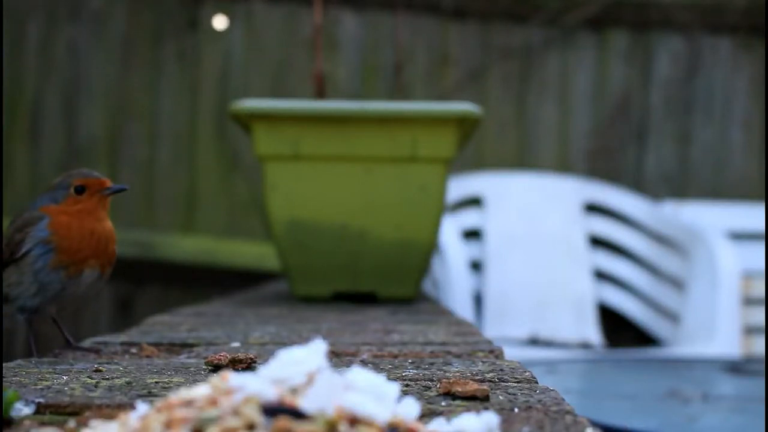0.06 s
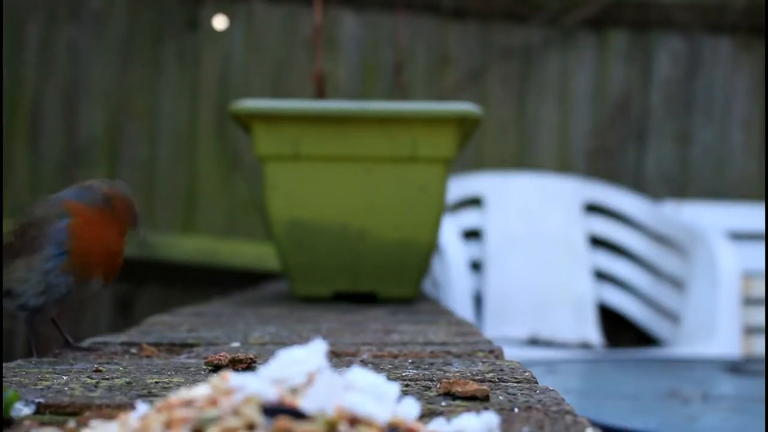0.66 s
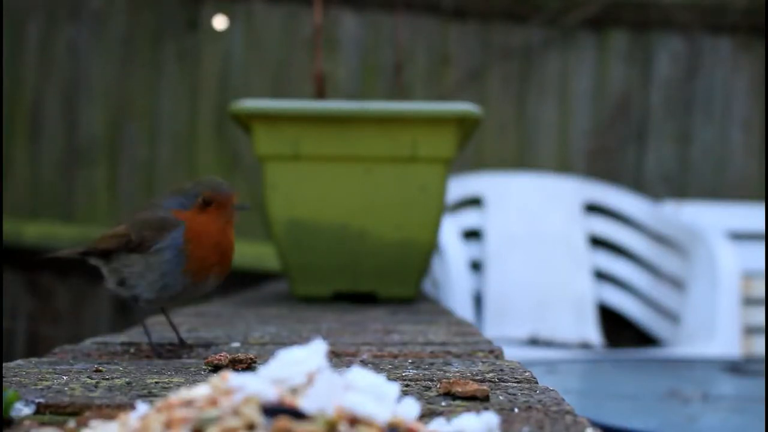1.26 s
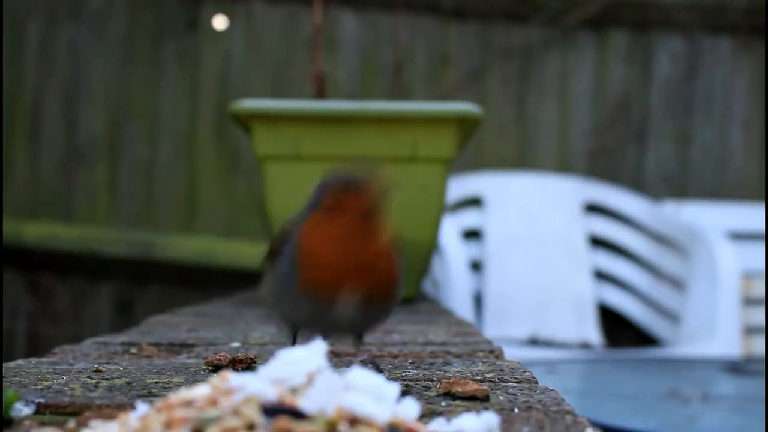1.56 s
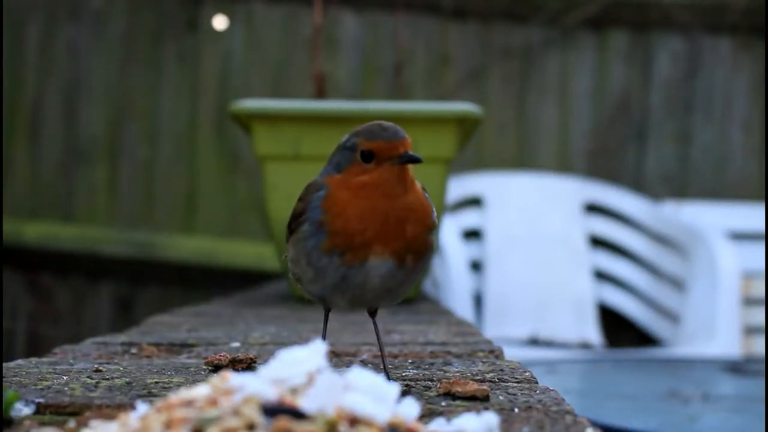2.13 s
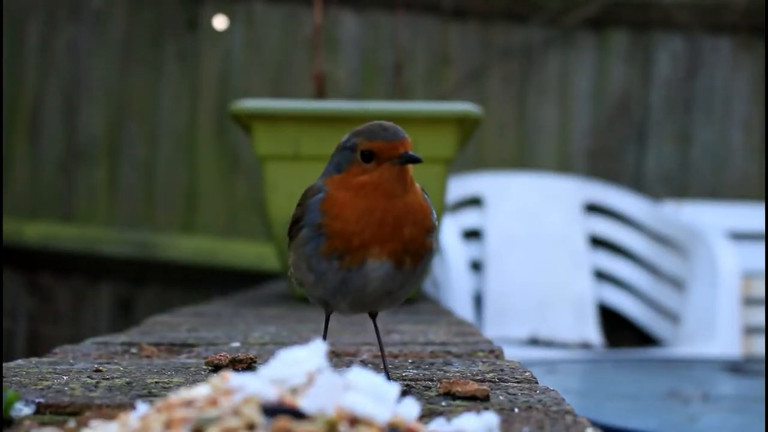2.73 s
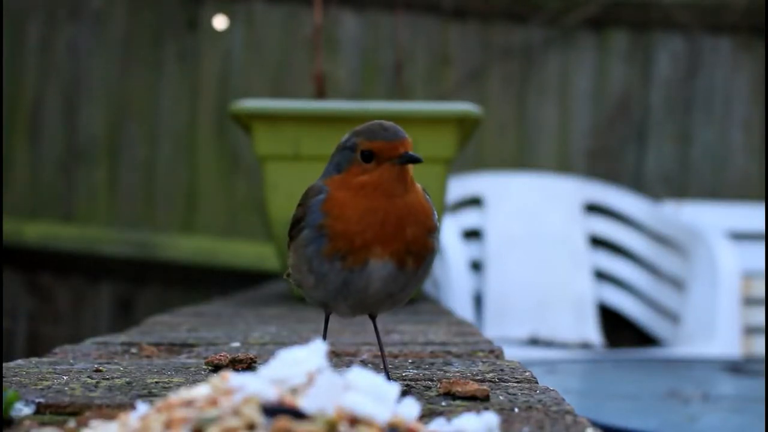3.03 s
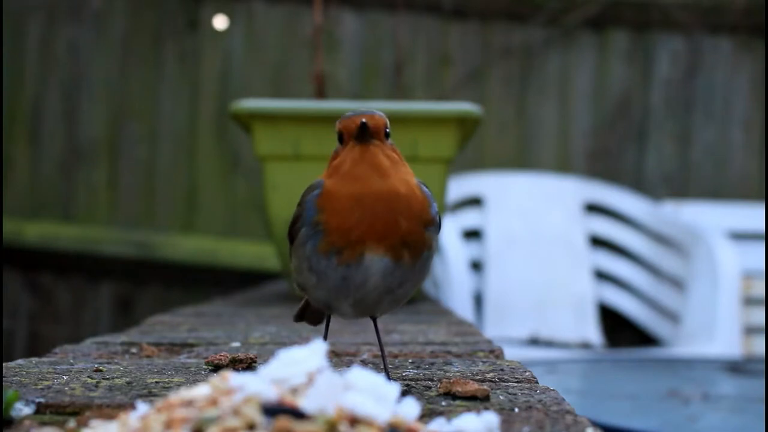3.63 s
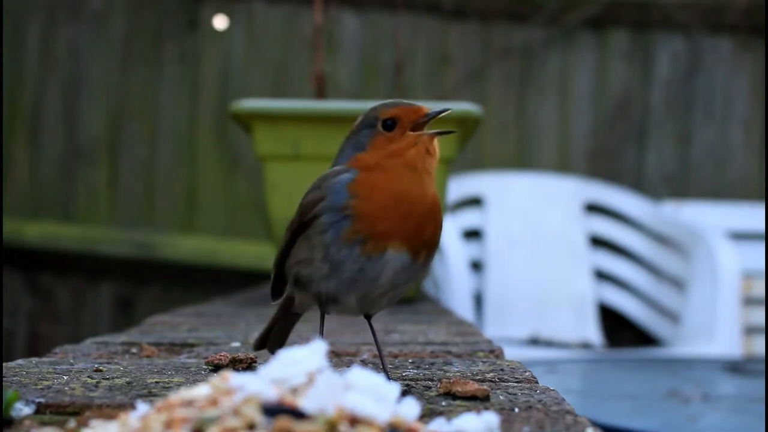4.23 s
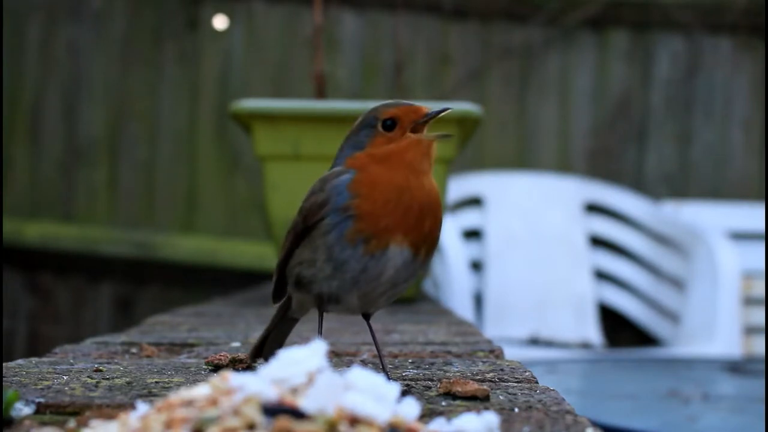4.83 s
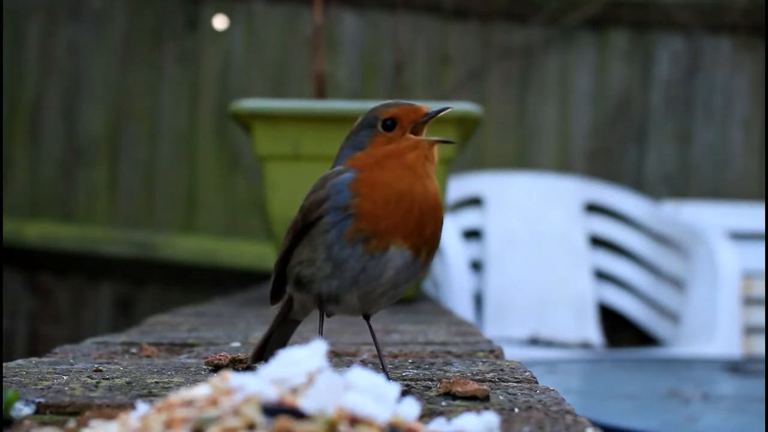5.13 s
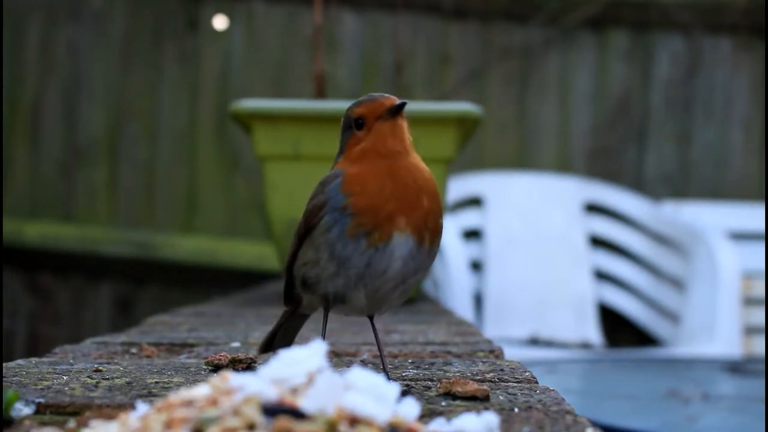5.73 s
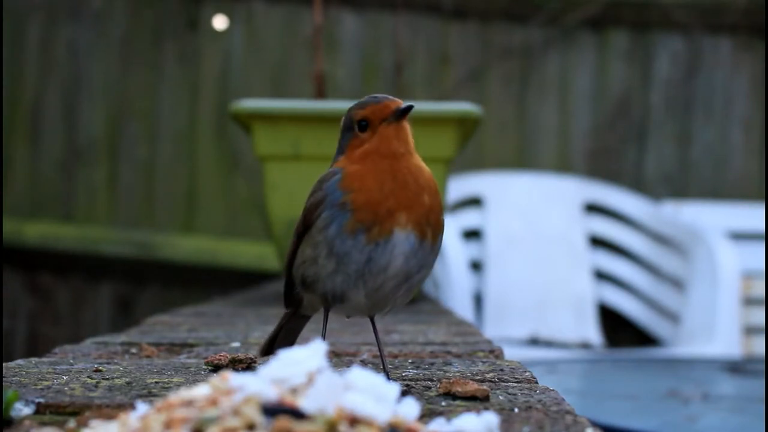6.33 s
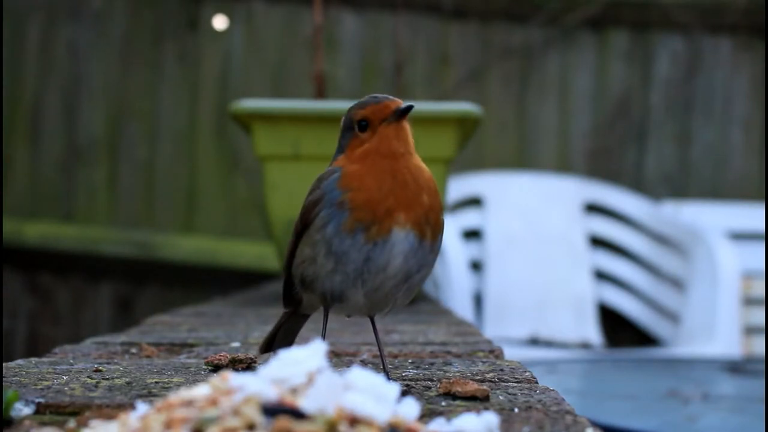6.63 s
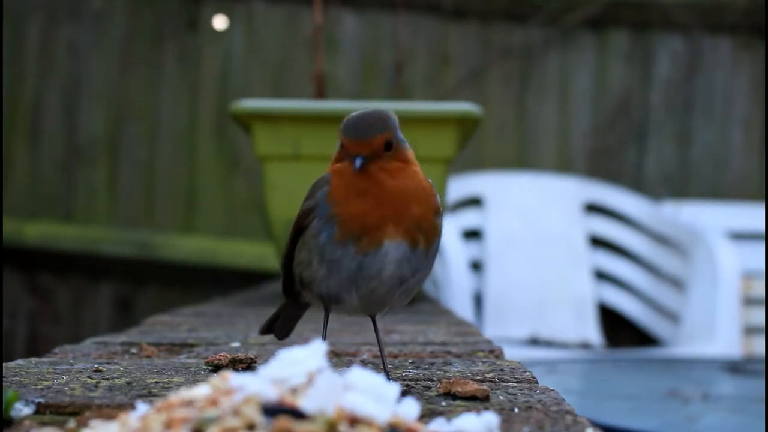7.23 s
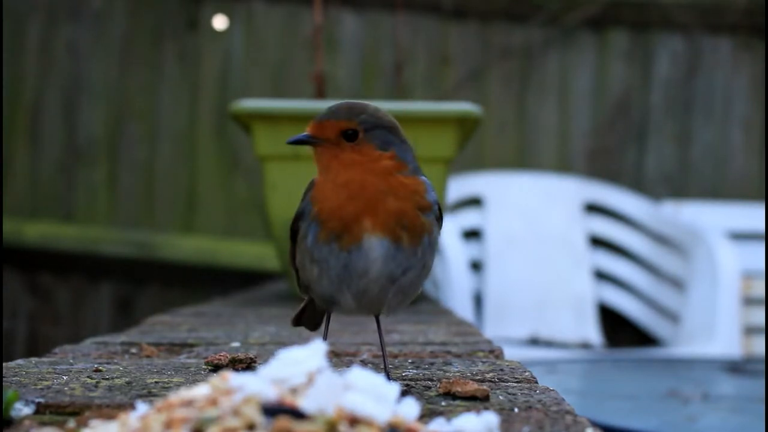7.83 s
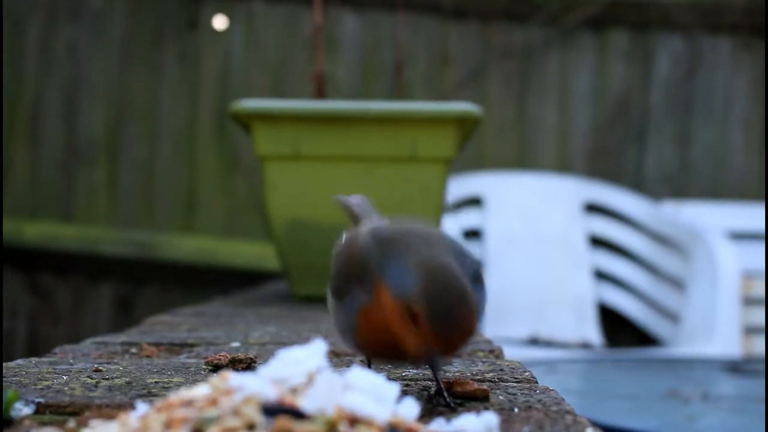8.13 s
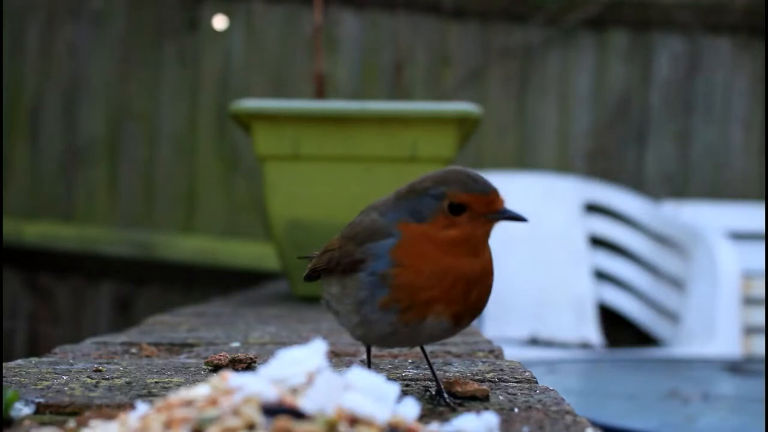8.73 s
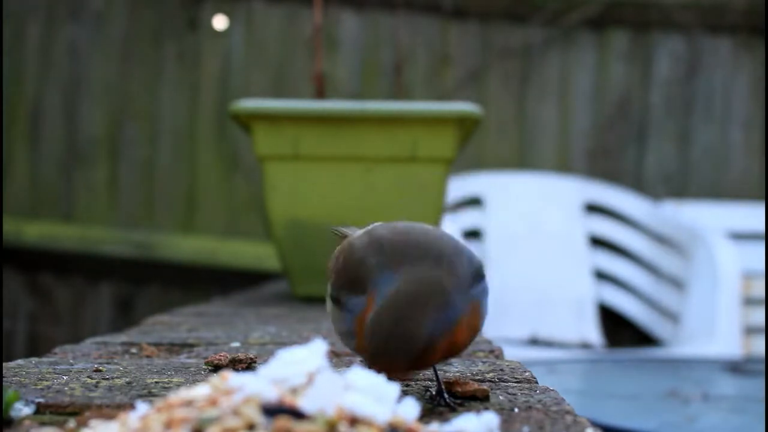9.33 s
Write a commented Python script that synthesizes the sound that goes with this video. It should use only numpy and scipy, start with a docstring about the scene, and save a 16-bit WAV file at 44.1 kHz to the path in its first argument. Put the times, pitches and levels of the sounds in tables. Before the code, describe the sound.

A robin sings a single loud burst right by the microphone, about two seconds of quick, high whistles, chips and buzzy warbles, after a quiet opening of far chirps and town hum. Partway through the phrase, a more distant pigeon begins low, hollow cooing. Once the robin stops, the coos continue in the garden with thin calls from small birds and a soft wash of faraway traffic.

```python
"""Fenced garden. A robin sings one loud phrase close to a camera on a table: two whistling
voices from the two sides of the syrinx, echoed by nearby surfaces. Farther off, a pigeon coos
in hoarse, hollow arches and small birds chirp, over the steady hum of a town.
The camera's gain control ducks the background under the loudest notes."""
import sys
import numpy as np
from scipy import signal
from scipy.fft import rfft, irfft
from scipy.io import wavfile
from scipy.ndimage import uniform_filter1d, minimum_filter1d

SR = 44100
rng = np.random.default_rng(int(sys.argv[2]) if len(sys.argv) > 2 else 0)


def store_pcm(level_fs):
    """Save levels as 16-bit WAV."""
    pcm = np.round(np.clip(level_fs, -1, 1) * 32767).astype(np.int16)
    wavfile.write(sys.argv[1], SR, np.atleast_2d(pcm).T)


N = 413216
TIME = np.arange(N) / SR

# robin, one table per side of the syrinx:
# (time [s], length [s], start [Hz], middle [Hz], end [Hz], level [dB], swell [dB])
UPPER_NOTES = [ (3.306, .045, 7580, 7620, 8490, -39.5, 6), (3.357, .022, 8630, 8600, 7000, -42, 23.5),
               (3.424, .1, 8560, 8250, 8056, -41.5, 10), (3.52, .03, 7704, 7450, 7550, -28.5, 4),
               (3.546, .024, 7620, 7950, 6110, -26, 5.5), (3.624, .012, 6260, 7200, 7940, -14.5, -5),
               (3.636, .013, 6250, 5300, 5540, -13.5, 6), (3.648, .012, 6356, 6280, 6594, -7, 0.5),
               (3.663, .019, 6682, 6030, 6776, -5.5, -1.5), (3.679, .01, 5910, 5180, 5390, -1.5, 1),
               (3.689, .01, 5460, 5100, 5870, -9, 4.5), (3.7, .009, 5810, 5130, 5940, -5, -1.5),
               (3.709, .008, 6664, 6100, 5410, -12, -2), (3.719, .014, 5186, 4400, 4664, -2, -15.5),
               (4.112, .023, 4020, 5100, 4550, -0.5, -3.5), (4.131, 0.058, 4470, 4170, 4324, 1.5, 3),
               (4.215, .028, 4690, 4430, 4265, -10, 3.5), (4.62, .027, 7260, 7290, 6600, -4, -3.5),
               (4.647, .011, 6480, 5900, 5630, -9, -5), (4.6985, .016, 5600, 5450, 5820, 5, -1),
               (4.74, .013, 6275, 6065, 6060, -7.5, -0.5), (4.754, .031, 5920, 4700, 4594, -0.5, -8),
               (4.8308, .023, 6170, 6250, 6096, 1, -4.5), (4.922, .014, 4180, 4300, 5900, -17.5, 7.5),
               (4.937, .009, 5580, 5600, 6010, -4.5, -2), (4.994, .042, 6830, 7290, 6980, -2, -2),
               (5.037, .067, 6840, 7240, 5650, -5, 2.5), (5.146, .042, 5560, 5040, 4870, 4.5, -6),
               (5.182, 0.029, 4880, 5425, 6350, 1.5, -6.5), (5.2632, .062, 4640, 4730, 4890, 1, -6), ]
LOWER_NOTES = [ (3.33, 0.049, 5730, 6800, 7300, -54.5, 24), (3.393, 0.13, 7300, 7360, 7020, -52, 18),
               (3.52, .048, 6620, 6440, 6800, -34, 2), (4.213, 0.023, 4274, 4050, 3966, 1, -5), ]
# robin's dry chips: (time [s], length [s], start [Hz], middle [Hz], end [Hz], peak [dB])
CHIPS = [ (3.766, .014, 3916, 5550, 4600, -3.5), (3.784, 0.015, 4880, 3476, 3455, -5),
         (3.8243, 0.01, 2994, 5010, 4400, -3), (3.845, .011, 4690, 3300, 4090, -7),
         (3.8856, 0.007, 4240, 5550, 4500, 2), (3.905, .009, 4774, 3650, 4400, -15),
         (3.942, .012, 4340, 6300, 5600, -6.5), (3.9658, 0.0076, 4960, 5600, 5000, -3.5),
         (4.023, .016, 5245, 7150, 5700, 1.5), (4.044, 0.012, 6783, 6750, 6150, -4.5), ]
# two-voice buzz: (time [s], upper pitch [Hz], lower pitch [Hz])
BUZZ = [(4.236, 4306, 3834), (4.27, 4240, 3820), (4.346, 4310, 3870), (4.446, 4320, 3710),
        (4.484, 4280, 3620), (4.524, 4338, 3665)]
# soft closing whistle: (time [s], pitch [Hz])
CLOSING_WHISTLE = [(5.334, 5550), (5.386, 5380), (5.41, 5170), (5.448, 4987), (5.535, 4965)]
# hoarse stretches of the song: (time [s], length [s], level [dB])
HOARSE_SPANS = [(3.623, 0.0956, -41), (4.154, 0.032, -50), (4.256, 0.28, -49.5), (4.931, 0.041, -40),
                (5.307, 0.1, -39.5)]
# beak and claw ticks: (time [s], level [dB])
TICKS = [(1.545, -58), (3.317, -48), (4.012, -33)]
# rasp and tick noise: (frequency [Hz], relative density [dB])
RASP_SPECTRUM = [(500, -32), (1300, -15), (2600, -3), (3800, 0), (5800, -3), (8000, -14), (11000, -23),
                 (16000, -36)]
# reflections off nearby surfaces: (delay [s], gain [dB])
ECHOES = [(.0021, -21.5), (.0058, -18.5), (0.012, -27.5), (0.017, -19.5), (.031, -27.5), (.052, -36.5)]
# pigeon: (time [s], length [s], start [Hz], top [Hz], end [Hz], top position [0-1],
# level [dB], swell [dB], roughness [0-1])
COOS = [ (4.02, 0.27, 401, 462, 457, 0.52, -43, 6, 0.4),
        (4.261, 0.18, 482.4, 615, 549, .68, -26.5, -10, 0.67),
        (4.579, 0.34, 476, 575, 336, 0.33, -25.5, -15.5, 0.38),
        (5.184, 0.29, 531, 545, 385, 0.3, -29.5, -6.5, 0.4),
        (5.569, 0.24, 437.5, 428, 353, 0, -37.5, -0.5, .1),
        (6.239, 0.23, 381.7, 548, 529.4, 0.55, -34.5, 6.5, 0.29),
        (6.714, 0.16, 388.3, 512, 490, 0.48, -31, 2.5, 0.54),
        (6.869, 0.14, 508.6, 511.7, 519.7, 0.56, -26, 1, .12),
        (7, .18, 519.7, 592, 541.6, 0.69, -29, -5, 0.46),
        (7.324, .32, 472, 590, 369, 0.33, -31.5, -3.5, 0.69),
        (7.936, 0.26, 471.4, 562, 480.6, 0.32, -32.5, 1.5, .55),
        (8.36, 0.32, 455, 462, 351, 0.14, -28.5, -17, 0.1),
        (9.03, 0.29, 383.6, 580, 545, 0.67, -32, -4.5, 0.57), ]
# far falling chirps: (time [s], middle pitch [Hz], relative level [dB])
FAR_FALLS = [ (1.45, 3540, -55), (1.781, 4090, -54), (2.07, 4030, -53), (2.31, 4170, -54),
             (2.551, 3980, -49), (2.65, 4980, -59), (5.62, 3940, -51), (5.905, 3950, -47),
             (6.16, 3950, -50.5), (6.42, 3854, -49), (6.49, 3970, -47.5), (6.741, 4050, -43),
             (6.97, 3900, -42.5), (7.05, 3700, -47), (7.212, 3910, -42), (7.441, 4030, -45.5),
             (7.709, 3880, -48), (8.205, 3800, -53), (8.21, 4900, -55), (8.534, 3934, -47.5),
             (8.755, 4850, -52), (8.84, 3990, -50), ]
# far upward flicks: (time [s], top pitch [Hz], relative level [dB])
FAR_FLICKS = [(0.189, 4500, -52), (.79, 4480, -52), (2.33, 7900, -55), (7.816, 8010, -52),
              (8.403, 8100, -55)]
# far whistles: (time [s], length [s], start [Hz], end [Hz], relative level [dB])
FAR_WHISTLES = [ (2.691, .031, 4570, 4420, -43.5), (3.315, 0.11, 3110, 2910, -52.5),
                (3.472, 0.12, 2390, 2280, -48), (5.81, 0.16, 4230, 4980, -58),
                (6.046, .21, 8500, 8950, -62), (6.45, 0.19, 5000, 4150, -50.5),
                (6.982, .14, 7610, 8550, -56), (7.15, 0.11, 7760, 8210, -45),
                (7.472, 0.051, 2720, 2758, -44.5), (7.5, 0.055, 3165, 3170, -31),
                (7.57, 0.16, 3145, 3130, -49), (7.922, .17, 8620, 8200, -45.5), (8.07, .1, 8400, 7760, -48),
                (8.25, .22, 3180, 3043, -46.5), (8.47, 0.23, 3030, 3010, -47), (8.5, 0.21, 2580, 2440, -52),
                ]
# echo in the far calls: (time [s], amplitude share [0-1])
FAR_ECHO_SHARE = [(1.8, 0.9), (2.6, 0.32), (5.9, 0.55), (6.6, 0.92), (7.6, 0.82), (8.7, 0.43)]
# blur of many distant birds: (time [s], level [dB])
CHATTER_LEVEL = [(0, -67.5), (2.2, -67), (2.65, -61), (3.1, -66), (6.2, -63.5), (6.6, -59.5), (7.6, -57),
                 (8.6, -52), (9.37, -76.5)]
# traffic wash: (frequency [Hz], relative density [dB])
TRAFFIC_SPECTRUM = [(15, -26), (25, -8.5), (53, 3), (84, -5), (363, 0.5), (394, -0.5), (641, -0.5),
                    (1160, -6), (2410, -21), (3080, -25.5), (4610, -29), (5000, -29), (7710, -35.5),
                    (13600, -49), (16000, -66)]
# town drone: (time [s], level [dB])
DRONE_LEVEL = [(0, -55), (1.3, -59.5), (3.3, -54.5), (5.5, -56), (6.8, -55), (7.6, -49), (8.4, -53),
               (9.37, -61)]

NOTE_ATTACK_S, NOTE_RELEASE_S = .0023, .0095


def robin(coupling=.7, knee=.12, shimmer_db=1.4, rough_hz_per_s=400000):
    """Two near-pure whistles; when both are strong, each bends the other at their beat rate."""
    (upper_hz, upper_amp), (lower_hz, lower_amp) = syrinx()
    lower_amp = lower_amp * amp(.5 * wander(60))
    sweep = uniform_filter1d(np.minimum(abs(np.gradient(upper_hz)) * SR / rough_hz_per_s, 1), size=130)
    upper_rad = phase(upper_hz * (1 + .0018 * wander(300) + .003 * wander(70)))
    upper_rad += .35 * sweep * wander(1500)  # fast sweeps turn rough
    lower_rad = phase(lower_hz * (1 + .0037 * wander(110)))
    pull = coupling * np.sin(upper_rad - lower_rad) / (upper_amp + lower_amp + knee)
    song = np.zeros(N)
    for rad, own_amp, other_amp in ((upper_rad, upper_amp, lower_amp), (lower_rad, lower_amp, upper_amp)):
        rad = rad + pull * other_amp
        song += own_amp * (np.sin(rad) + amp(-38) * np.sin(2 * rad) + amp(-50) * np.sin(3 * rad))
    song *= amp(shimmer_db * wander(120))
    return song + rasp(song, sweep)


def syrinx():
    """Upper and lower voice: quick notes, chips, a shared buzz, a closing whistle."""
    buzz_s, upper_hz, lower_hz = np.transpose(BUZZ)
    upper = [note(*row) for row in UPPER_NOTES] + [chip(*row) for row in CHIPS]
    upper.append(held_note(buzz_s, upper_hz, db=-8, swell_db=-6.5))
    upper.append(held_note(*np.transpose(CLOSING_WHISTLE), db=-17.5, swell_db=-2.5,
                           attack_s=.019, release_s=.065))
    lower = [note(*row) for row in LOWER_NOTES]
    lower.append(held_note(buzz_s, lower_hz, db=-14.5, swell_db=-6.5))
    return voice(upper), voice(lower)


def note(at_s, length_s, start_hz, middle_hz, end_hz, db, swell_db):
    """Bent glide: snaps on, closes more slowly."""
    hz = glide(length_s, start_hz, middle_hz, end_hz)
    release_s = min(NOTE_RELEASE_S, .38 * length_s)
    return at_s, hz, envelope(len(hz), db, swell_db, NOTE_ATTACK_S, release_s)


def chip(at_s, length_s, start_hz, middle_hz, end_hz, db, bend=1.2, skew=.76, sharpness=1.3):
    """Pitch darts out and back under a pointed envelope."""
    u = np.linspace(0, 1, int(length_s * SR))
    hz = middle_hz + (np.where(u < .5, start_hz, end_hz) - middle_hz) * abs(2 * u - 1) ** bend
    return at_s, hz, amp(db) * abs(np.sin(np.pi * u ** skew)) ** sharpness


def held_note(times_s, pitches_hz, db, swell_db, attack_s=NOTE_ATTACK_S, release_s=NOTE_RELEASE_S):
    """Long note on a drifting pitch."""
    hz = np.interp(np.arange(times_s[0], times_s[-1], 1 / SR), times_s, pitches_hz)
    return times_s[0], hz, envelope(len(hz), db, swell_db, attack_s, release_s)


def rasp(song, sweep, air_db=-43, sweep_db=-17, chip_db=-29.5, tick_decay_s=.0013):
    """Noise: faint rush under notes, scratch in sweeps and chips, hoarse spans, dry ticks."""
    gain = (amp(air_db) + amp(sweep_db) * sweep ** 2) * uniform_filter1d(abs(song), size=90)
    for row in CHIPS:
        at_s, _, chip_amp = chip(*row)
        add(gain, at_s, amp(chip_db) * chip_amp)
    for at_s, length_s, db in HOARSE_SPANS:
        add(gain, at_s, amp(db) * signal.windows.tukey(int(length_s * SR), .5))
    for at_s, db in TICKS:
        add(gain, at_s, amp(db) * np.exp(-TIME[:1000] / tick_decay_s))
    return gain * shaped_noise(RASP_SPECTRUM)


def garden(song, tail_db=-20):
    """Direct song, single echoes off table, pot and fence, short tail."""
    out = song + amp(tail_db) * scatter(song, t60_s=.26, delay_s=.0089)
    for delay_s, db in ECHOES:
        add(out, delay_s, amp(db) * song)
    return out


def pigeon(flutter_hz=70, second_harmonic_db=-27, tail_db=-11):
    """Hollow arching tone; amplitude and phase flutter where the throat turns hoarse."""
    coos, rough = [], np.zeros(N)
    for at_s, length_s, start_hz, top_hz, end_hz, top, db, swell_db, roughness in COOS:
        u = np.linspace(0, 1, int(length_s * SR))
        top = np.clip(top, .01, .99)
        before, after = np.maximum(1 - u / top, 0), np.maximum((u - top) / (1 - top), 0)
        hz = top_hz + (start_hz - top_hz) * before ** 2 + (end_hz - top_hz) * after ** 1.1
        coos.append((at_s, hz, envelope(len(u), db, swell_db, attack_s=.038, release_s=.035)))
        rough[round(at_s * SR):] = roughness
    hz, gain = voice(coos)
    rad = phase(hz)
    hoarse = (wander(flutter_hz) * np.sin(rad) + wander(flutter_hz) * np.cos(rad)) / np.sqrt(2)
    fundamental = np.sqrt(1 - rough ** 2) * np.sin(rad) + rough * hoarse
    coo = gain * (fundamental + amp(second_harmonic_db) * np.sin(2 * rad))
    return coo + amp(tail_db) * scatter(coo, t60_s=.87, delay_s=.011)


def far_birds(gain_db=-1, fall_s=.055, flick_s=.049):
    """Thin falls, flicks and whistles; crisp at some moments, echoing at others."""
    flick_curve = 1 - .25 * np.linspace(1, 0, int(flick_s * SR)) ** 2
    calls = [(at_s, glide(fall_s, 1.17 * hz, hz, .88 * hz), db) for at_s, hz, db in FAR_FALLS]
    calls += [(at_s, hz * flick_curve, db) for at_s, hz, db in FAR_FLICKS]
    calls += [(at_s, np.linspace(start_hz, end_hz, int(length_s * SR)), db)
              for at_s, length_s, start_hz, end_hz, db in FAR_WHISTLES]
    direct, echo_send, waver = np.zeros(N), np.zeros(N), wander(220)
    for at_s, hz, db in calls:
        depth_hz = .04 * np.ptp(hz) + .0136 * np.maximum(hz - 3000, 0)  # wide or high calls waver more
        hz = hz + depth_hz * np.roll(waver, -int(at_s * SR))[:len(hz)]
        chirp = amp(db + gain_db) * signal.windows.tukey(len(hz), .5) * np.sin(phase(hz))
        wet = np.interp(at_s, *np.transpose(FAR_ECHO_SHARE))
        add(direct, at_s, np.sqrt(1 - wet ** 2) * chirp)
        add(echo_send, at_s, wet * chirp)
    return direct + scatter(echo_send, t60_s=.64, delay_s=.0037)


def chatter(count=900, low_hz=2450, high_hz=4350):
    """Distant birds: random falling chirps, heard only as echo."""
    chirps, u = np.zeros(N), np.linspace(0, 1, SR // 18)
    for when, pitch, fall, strength in rng.random((count, 4)):
        middle_hz = low_hz * (high_hz / low_hz) ** (pitch ** 1.3)
        hz = middle_hz * (1 + (.12 + .2 * fall) * (.5 - u))
        add(chirps, when * N / SR, (.5 + strength) * np.hanning(len(u)) * np.sin(phase(hz)))
    return level_curve(CHATTER_LEVEL) * unit_rms(scatter(chirps, t60_s=.4, delay_s=.01))


def town(traffic_db=-40, swell_db=.08, drone_hz=58.4):
    """Near-steady wash of far traffic over a low wavering drone."""
    drone = (wander(11) + .7) * np.sin(2 * np.pi * drone_hz * TIME)
    traffic = amp(traffic_db - swell_db * wander(1.2)) * shaped_noise(TRAFFIC_SPECTRUM)
    return traffic + level_curve(DRONE_LEVEL) * unit_rms(drone)


def scatter(x, t60_s, delay_s):
    """Decaying tail of faint reflections off fences and leaves."""
    t = TIME[:SR]
    taps = rng.standard_normal(SR) * (rng.random(SR) < .1) * amp(-60 * t / t60_s) * (t > delay_s)
    return signal.fftconvolve(x, taps / np.linalg.norm(taps))[:N]


def voice(notes):
    """Joins (time, pitch, amplitude) notes into one pitch track and one amplitude track."""
    hz, gain = np.zeros(N), np.zeros(N)
    for at_s, note_hz, note_amp in sorted(notes, key=lambda n: n[0]):
        start = round(at_s * SR)
        hz[start:] = note_hz[-1]
        hz[start:start + len(note_hz)] = note_hz[:N - start]
        add(gain, at_s, note_amp)
    return hz, gain


def envelope(samples, db, swell_db, attack_s, release_s):
    """Attack and release on an even swell or fade."""
    t = TIME[:samples]
    gate = np.clip(t / attack_s, 0, 1) * np.clip((t[-1] - t) / release_s, 0, 1)
    return np.sin(np.pi / 2 * gate) ** 2 * amp(db + swell_db * t / t[-1])


def glide(length_s, start_hz, middle_hz, end_hz):
    """Parabola through three pitches."""
    u = np.linspace(0, 1, int(length_s * SR))
    return np.polyval(np.polyfit([0, .5, 1], [start_hz, middle_hz, end_hz], 2), u)


def shaped_noise(spectrum):
    """Unit-rms noise with the given spectrum."""
    hz, db = np.transpose(spectrum)
    bins_hz = np.fft.rfftfreq(N, 1 / SR)
    gain = amp(np.interp(np.log(bins_hz + 1), np.log(hz), db))
    return unit_rms(irfft(rfft(rng.standard_normal(N)) * gain, N))


def wander(cutoff_hz, samples=1 << 19):
    """Unit-rms low-passed noise."""
    bins_hz = np.fft.rfftfreq(samples, 1 / SR)
    lowpass = np.exp(-np.minimum((bins_hz / cutoff_hz) ** 2, 50))
    return unit_rms(irfft(rfft(rng.standard_normal(samples)) * lowpass)[:N])


def level_curve(points):
    return amp(np.interp(TIME, *np.transpose(points)))


def phase(hz):
    return 2 * np.pi * np.cumsum(hz) / SR


def amp(db):
    return 10 ** (np.asarray(db) / 20)


def unit_rms(x):
    return x / np.sqrt(np.mean(x ** 2) + 1e-20)


def add(mix, at_s, sound):
    part = mix[max(round(at_s * SR), 0):][:len(sound)]
    part += sound[:len(part)]


def gain_control(x, threshold_db=-7, recovery_db_per_s=40, attack_s=.081, ceiling=.87):
    """Slow gain ducks after peaks; a fast limiter catches the attacks it lets through."""
    over_db = np.maximum(20 * np.log10(abs(x) + 1e-9) - threshold_db, 0)
    recovery_db = recovery_db_per_s * TIME
    held_db = np.maximum.accumulate(over_db + recovery_db) - recovery_db
    pole = np.exp(-1 / (attack_s * SR))
    x = x * amp(-signal.lfilter([1 - pole], [1, -pole], held_db))
    limiter_gain = np.minimum(ceiling / (abs(x) + 1e-9), 1)
    return x * uniform_filter1d(minimum_filter1d(limiter_gain, size=161), size=121)


def side_tones(x, step_hz=3900):
    """Faint images one and two steps above and below each note, stronger for high notes."""
    rad = 2 * np.pi * step_hz * TIME
    images = 2 * np.diff(x, prepend=0) * (amp(-32) * np.cos(rad) + amp(-46) * np.cos(2 * rad))
    return signal.sosfilt(signal.butter(2, 900, "highpass", fs=SR, output="sos"), images)


def scene():
    """Mono mix, near to far."""
    return (garden(robin()) + pigeon() + far_birds() + chatter() + town())[None]


def record(dry, cutoff_hz=15600):
    """Camera: gain control, side tones, band limit."""
    x = gain_control(dry[0])
    lowpass = signal.firwin(511, cutoff_hz, window=("kaiser", 9), fs=SR)
    return signal.oaconvolve(x + side_tones(x), lowpass, "same")[None]


dry = scene()
out = record(dry)
store_pcm(out)
```